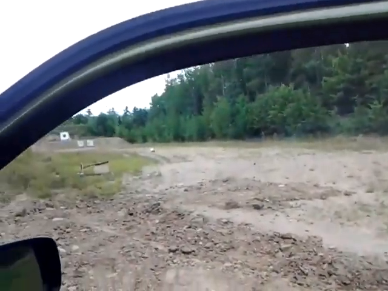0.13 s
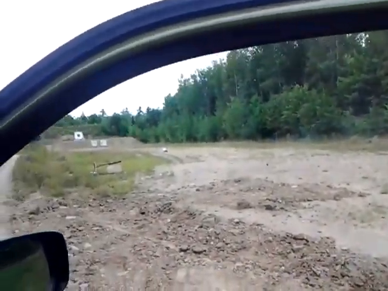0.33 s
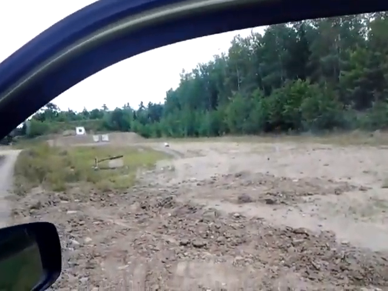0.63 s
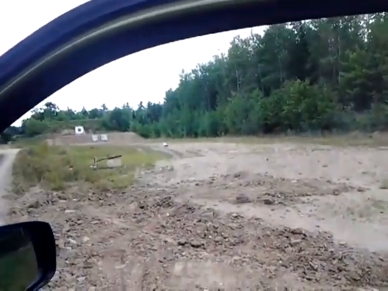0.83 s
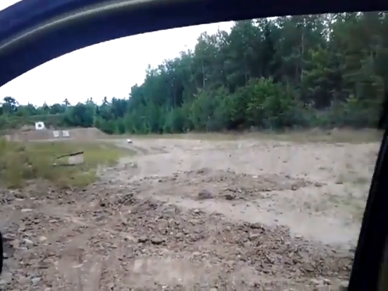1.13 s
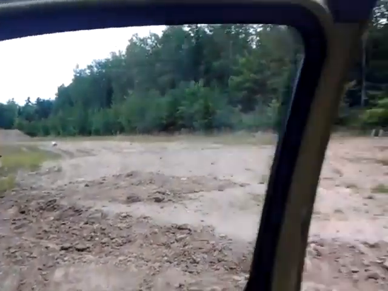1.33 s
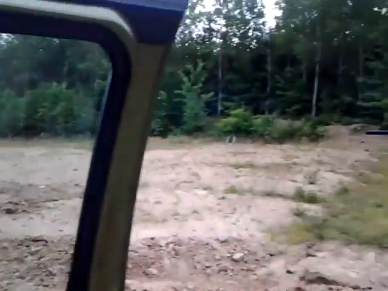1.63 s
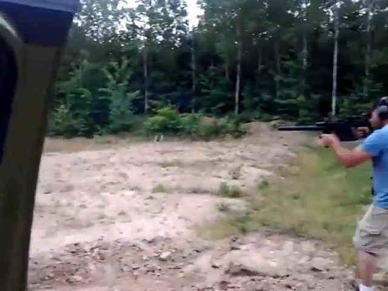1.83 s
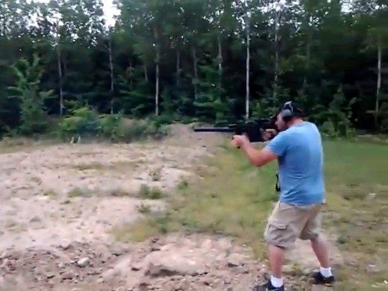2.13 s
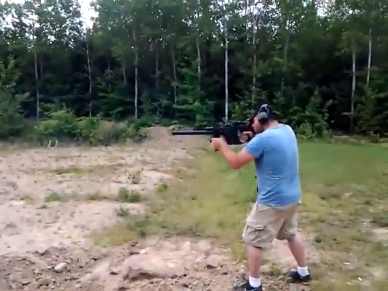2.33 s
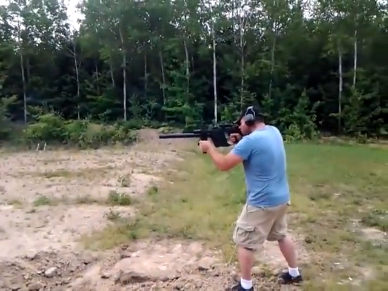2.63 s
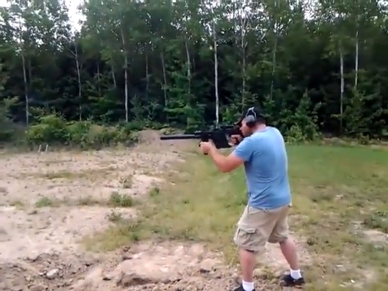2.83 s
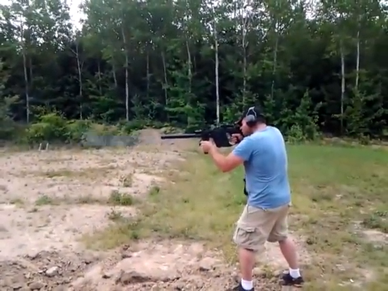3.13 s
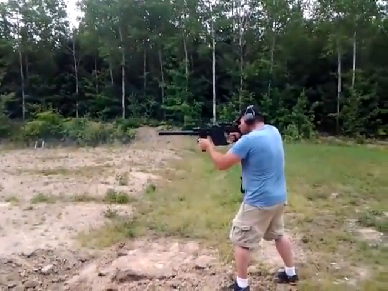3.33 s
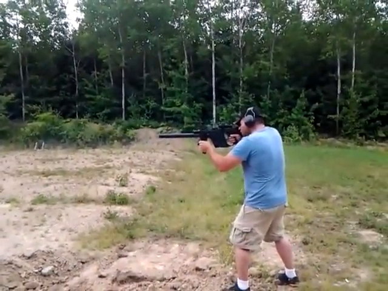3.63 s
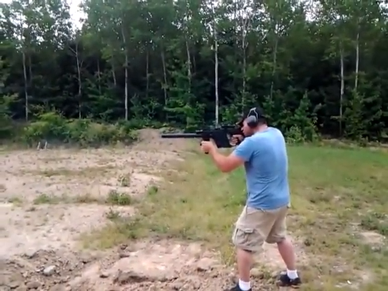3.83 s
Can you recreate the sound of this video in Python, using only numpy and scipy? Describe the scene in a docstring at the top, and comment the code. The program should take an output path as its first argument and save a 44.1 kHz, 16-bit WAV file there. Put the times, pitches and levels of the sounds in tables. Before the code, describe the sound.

A rifle fires twice, loud and distorted, heard from an open car window, each blast echoing off the trees. Before that, a previous shot's echo dies away, followed by faint close rustling and small ticks.

```python
"""Rifle range from a parked car

Outdoors, the microphone at the car's open window. A rifle fires three times, first just before the start.
Each blast overloads the microphone, scatters back from the tree line and rolls away through the forest.
Between shots, close up, cloth rustles as the camera is turned, a hand bumps and small things tick."""
import sys
import numpy as np
from scipy import signal
from scipy.fft import rfft, irfft, next_fast_len
from scipy.io import wavfile

SR = 44100
rng = np.random.default_rng(int(sys.argv[2]) if len(sys.argv) > 2 else 0)


def inscribe(sig):
    """Save sig as 16-bit PCM at rate SR to the path in sys.argv[1].

    A 1-D sig is mono; a 2-D sig holds one channel per row.
    Samples are clipped to [-1, 1] before scaling.
    """
    pcm = np.round(np.clip(np.atleast_2d(sig).T, -1, 1) * 32767)
    wavfile.write(sys.argv[1], SR, pcm.astype(np.int16))


N = 176400
BLAST_S, TAIL_S = .3, 2.2


def amp(db):
    """Decibels to gain."""
    return 10 ** (np.asarray(db) / 20)


def clock(seconds):
    """Time axis of a sound."""
    return np.arange(round(seconds * SR)) / SR


def add(mix, start, sound):
    """Mixes a sound in at a time, which may lie before zero."""
    at = round(start * SR)
    sound = sound[max(-at, 0):]
    part = mix[max(at, 0):][:len(sound)]
    part += sound[:len(part)]


def curve_at(points, hz):
    """Reads a table on a log-frequency axis."""
    f, value = np.transpose(points)
    return np.interp(np.log(hz + 1), np.log(f + 1), value)


def noise(colour, length, grain_db=0):
    """Coloured noise near rms 1; grain gives its tiny impulses unequal sizes."""
    size = next_fast_len(length)
    white = rng.standard_normal(size) * amp(grain_db * np.minimum(rng.exponential(1, size), 6))
    gain = amp(curve_at(colour, np.fft.rfftfreq(size, 1 / SR)))
    coloured = irfft(rfft(white) * gain, size)
    return coloured[:length] / np.sqrt(np.mean(coloured ** 2) + 1e-20)


def burst(colour, stretch, db, hold_s, fall_db_per_s, attack_s=.0003):
    """Noise that starts at once, holds and falls; stretch lengthens the hold and the fall."""
    t = clock(BLAST_S)
    fallen_db = fall_db_per_s * np.maximum(t / stretch - hold_s, 0)
    return noise(colour, len(t)) * np.minimum(t / attack_s, 1) * amp(db - fallen_db)


def puff(colour, db, decay_s):
    """A brief knock of coloured noise."""
    age = clock(.1) / decay_s
    return noise(colour, len(age)) * amp(db) * np.minimum(4 * age, 1) * np.exp(-age)


def ring(modes):
    """Struck modes dying away."""
    t = clock(BLAST_S)
    return sum(amp(db - 60 * t / t60) * np.sin(2 * np.pi * hz * t) for hz, db, t60 in modes)


# Spectra of the crack and the boom at the car window: f/Hz, level/dB
CRACK_SPECTRUM = [(25, -3.5), (60, -6.5), (130, 0), (200, -8), (300, -1.5), (450, -5), (750, -2.5),
                  (1000, -5), (1650, -1), (2300, 1.5), (2850, -3.5), (3300, 3.5), (4300, -7.5), (5400, -4),
                  (6600, -0.5), (8400, 0.5), (10000, -12.5), (16000, -23.5)]
BOOM_SPECTRUM = [(25, -16), (120, -8), (200, -12.5), (300, -5.5), (450, -7), (750, 7), (1000, -2),
                 (1600, 0), (2300, -3.5), (3500, -3), (6000, -27.5), (16000, -50.5)]
def blast(stretch):
    """The pressure wave comes straight to the microphone: a bright crack and a darker boom."""
    out = burst(CRACK_SPECTRUM, stretch, db=9.5, hold_s=.019, fall_db_per_s=680)
    boom = burst(BOOM_SPECTRUM, stretch, db=2, hold_s=.031, fall_db_per_s=950)
    add(out, .002 * stretch, boom)
    return out


# Modes of the cabin, right by the microphone: f/Hz, level/dB, t60/s
CABIN_MODES = [(32, -4, .07), (125, 0, .1), (290, 0, .12)]
def cabin_thump():
    """The car's cabin thumps under the pressure wave."""
    return ring(CABIN_MODES)


def scatter(colour, t60, rise_s, db, grain_db, roll_db=1.0, roll_step_s=.014):
    """Countless small reflections swell, roll unevenly and die, the treble first."""
    t = clock(TAIL_S)
    hz, frame_s, bands = signal.stft(noise(colour, len(t), grain_db), SR, nperseg=512)
    decay = amp(-60 * np.maximum(frame_s - rise_s, 0) / curve_at(t60, hz)[:, None])
    tail = signal.istft(bands * decay, SR, nperseg=512)[1][:len(t)]
    knots = np.arange(0, TAIL_S, roll_step_s)
    roll = np.interp(t, knots, rng.standard_normal(len(knots)))
    return amp(db + roll_db * roll) * np.minimum(t / rise_s, 1) * tail


# Return from the near trees: f/Hz, level/dB; its decay: f/Hz, t60/s
TREE_LINE_SPECTRUM = [(40, -39), (110, -25), (200, -19.5), (320, -14.5), (480, -11), (700, -5),
                      (1000, -2.5), (1250, -8), (1550, 1), (1900, -8.5), (2350, -5), (2900, -8), (3500, -2),
                      (4300, -10), (5200, -6.5), (6300, -2), (7400, -4), (8500, -9), (10000, -15.5),
                      (12000, -19), (15000, -27.5)]
TREE_LINE_DECAY = [(100, 0.68), (500, 0.72), (1500, 0.92), (3500, 0.72), (7000, 0.59), (11000, 0.45),
                   (16000, 0.16)]
def tree_line():
    """The near trees scatter the blast back, bright and short."""
    return scatter(TREE_LINE_SPECTRUM, TREE_LINE_DECAY, rise_s=.11, db=-12, grain_db=2)


# Return from deep in the forest: f/Hz, level/dB; its decay: f/Hz, t60/s
FOREST_SPECTRUM = [(40, -35.5), (110, -25), (200, -21.5), (320, -14.5), (480, -9), (700, -1.3),
                   (1000, -1.5), (1250, -1), (1550, -4.5), (1900, -10.5), (2350, -7), (2900, -16),
                   (3500, -14), (4300, -24), (5200, -20), (6300, -17), (7400, -21), (8500, -26.5),
                   (11000, -50), (16000, -61)]
FOREST_DECAY = [(100, 1.5), (400, 2.48), (800, 2.56), (1500, 2.17), (3500, 1.79), (6200, 1.56), (8000, 1.1),
                (12000, 1.2)]
def forest():
    """Farther off, the blast rolls away among the trees, darker and longer."""
    return scatter(FOREST_SPECTRUM, FOREST_DECAY, rise_s=.18, db=-21.5, grain_db=2.5)


# Clank at the rifle: f/Hz, level/dB; modes of its action: f/Hz, level/dB, t60/s
BOLT_SPECTRUM = [(25, -13.5), (300, -13.5), (1000, -9), (2300, -0.5), (2850, -6.5), (3350, 9.5),
                 (4300, -12), (5400, -5), (6800, 4.5), (8800, 3.5), (10000, -14), (16000, -19)]
ACTION_MODES = [(3425, -12, .2), (6790, -15.5, .12), (2315, -17, .17), (1780, -19, .22), (6220, -22, .15),
                (8550, -18, .07)]
def bolt(stretch):
    """The bolt clanks as it cycles and sets the action ringing."""
    clank = burst(BOLT_SPECTRUM, stretch, db=-.5, hold_s=.004, fall_db_per_s=950)
    return clank + ring(ACTION_MODES)


# Reflections off nearby banks: t/s after the shot, level/dB
BANK_SLAPS = [(.0975, 6.5), (.0992, 6.5), (.1226, 4)]
def bank_slaps(mix, hz=1400, decay_s=.0004):
    """The banks throw the blast back as sharp pulses."""
    t = clock(BLAST_S)
    pulse = t / decay_s * np.exp(-t / decay_s) * np.sin(2 * np.pi * hz * t)
    for delay, db in BANK_SLAPS:
        add(mix, delay, amp(db) * pulse)


# Clumps of trees, near to far: t/s after the shot, level/dB, decay/s; their spectrum: f/Hz, level/dB
CLUMP_ECHOES = [(0.124, -11.5, .002), (0.15, -9.5, 0.004), (0.195, -7, 0.0035), (.235, -10, 0.0028),
                (0.448, -22, 0.0048), (0.543, -26, .007), (0.596, -36.5, 0.01)]
CLUMP_SPECTRUM = [(60, -47.5), (400, -14.5), (800, -4.5), (1500, 10), (2500, -6.5), (3500, -7), (4500, -17),
                  (7000, -12.5), (14000, -50)]
def clump_echoes(mix):
    """Each clump of trees returns one smeared echo."""
    for delay, db, decay_s in CLUMP_ECHOES:
        add(mix, delay, puff(CLUMP_SPECTRUM, db, decay_s))


# Shots on the range: t/s, level/dB, blast length relative to normal
RIFLE_SHOTS = [(-.1, 0, 1.0), (1.9785, -.8, 1.0), (3.2086, 1.5, 1.08)]
def rifle_shots(mix):
    """Each shot reaches the car with its returns from the banks and the woods."""
    for start, db, stretch in RIFLE_SHOTS:
        shot = np.zeros_like(clock(TAIL_S))
        add(shot, 0, blast(stretch) + cabin_thump())
        add(shot, .03, tree_line())
        add(shot, .033, forest())
        add(shot, .036 * stretch, bolt(stretch))
        bank_slaps(shot)
        clump_echoes(shot)
        add(mix, start, amp(db) * shot)


# Ambience at the open window: f/Hz, level/dB
AIR_SPECTRUM = [(25, -4), (60, -5), (130, -4), (300, -2.5), (700, 0.5), (1100, -2.5), (1800, -14.5),
                (3000, -17), (4500, -19), (6500, -22), (7900, -12), (8900, -14), (9800, -22),
                (15000, -24.5)]
def outdoor_air():
    """A quiet, steady hush lies under the shots."""
    return amp(-57) * noise(AIR_SPECTRUM, N)


# Two movements close to the microphone: t/s, level/dB; their spectra: f/Hz, level/dB
SWISH_LEVELS = [(.65, -86), (.667, -39), (.7, -44), (.8, -45.5), (.9, -53.5), (1.05, -58.5), (1.2, -64),
                (1.28, -62)]
TURN_LEVELS = [(1.28, -63), (1.315, -49), (1.38, -52.5), (1.44, -50.5), (1.505, -41), (1.57, -44.5),
               (1.61, -56.5), (1.66, -53), (1.71, -57), (1.76, -68)]
SWISH_SPECTRUM = [(100, -18), (1000, -8), (1850, -4.5), (2050, 5), (2450, 3), (2900, -10.5), (3350, 0),
                  (3700, 4.5), (4300, -13), (5300, -4.5), (6100, -9.5), (6700, -3.5), (8500, -20),
                  (15000, -34.5)]
TURN_SPECTRUM = [(40, -21), (110, -16), (200, -6.5), (320, -3), (480, -5), (700, 1), (1000, -6.5),
                 (1250, -2.5), (1550, -2.5), (1900, -2), (2350, -3.5), (2900, -7), (3500, -7.1),
                 (4300, -14), (5200, -17.5), (6300, -12), (7400, -12), (8500, -18.6), (10000, -23),
                 (12000, -25), (15000, -30.8)]
def cloth_rustle(mix):
    """Grainy friction of cloth: a bright swish, then a duller rub as the camera turns."""
    movements = (SWISH_LEVELS, SWISH_SPECTRUM, 2.5), (TURN_LEVELS, TURN_SPECTRUM, 3)
    for levels, colour, grain_db in movements:
        level_db = np.interp(np.arange(N) / SR, *np.transpose(levels), left=-120, right=-120)
        mix += noise(colour, N, grain_db) * amp(level_db)


# Ticks near the microphone: t/s, level/dB; their spectrum: f/Hz, level/dB
SMALL_TICKS = [(.66, -43), (0.892, -40.5), (.902, -50), (1.03, -48), (1.083, -47), (1.41, -48),
               (1.432, -50), (1.815, -48), (2.975, -50)]
TICK_SPECTRUM = [(500, -12), (3500, -10), (7000, 3), (10000, -6), (15000, -6)]
def small_ticks(mix):
    """Small things tick, thin and bright."""
    for start, db in SMALL_TICKS:
        add(mix, start, puff(TICK_SPECTRUM, db, decay_s=.003))


# Handling bumps at the microphone: t/s, level/dB; their spectrum: f/Hz, level/dB
HAND_BUMPS = [(0.896, -53), (1.026, -48.5)]
BUMP_SPECTRUM = [(40, -20), (120, -6), (200, 6), (400, -11), (2000, -35), (16000, -60)]
def hand_bumps(mix):
    """The hand knocks, soft and low."""
    for start, db in HAND_BUMPS:
        add(mix, start, puff(BUMP_SPECTRUM, db, decay_s=.016))


def scene():
    """Shots, outdoor air and handling at one microphone, the same in both channels."""
    mono = np.zeros(N)
    rifle_shots(mono)
    mono += outdoor_air()
    cloth_rustle(mono)
    small_ticks(mono)
    hand_bumps(mono)
    return np.array([mono, mono])


OVERLOAD_LEVEL, BAND_EDGE_HZ = .81, 15950
def record(dry):
    """The microphone input clips hard on each blast; a steep low-pass follows."""
    clipped = np.clip(dry, -OVERLOAD_LEVEL, OVERLOAD_LEVEL)
    low_pass = signal.firwin(511, BAND_EDGE_HZ, window=("kaiser", 9), fs=SR)
    return signal.oaconvolve(clipped, low_pass[None], "same")


dry = scene()
out = record(dry)
inscribe(out)
```